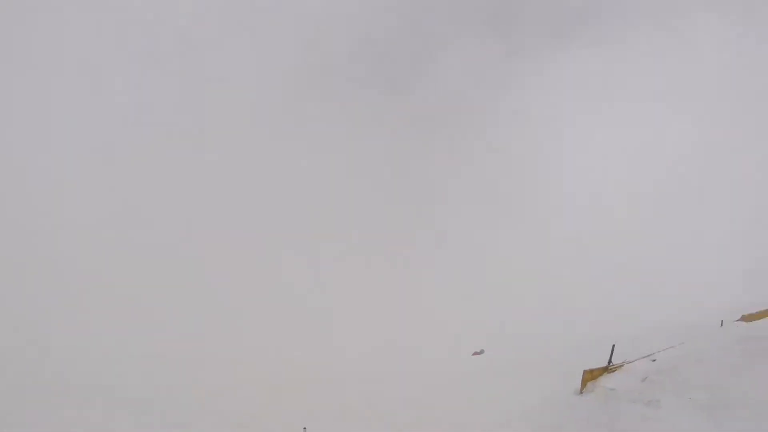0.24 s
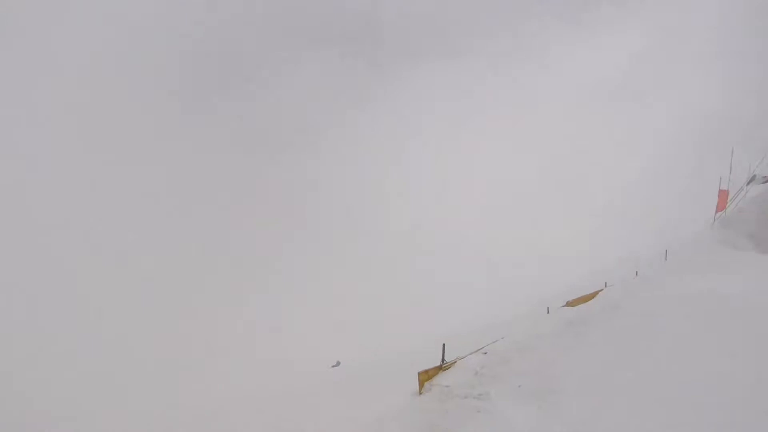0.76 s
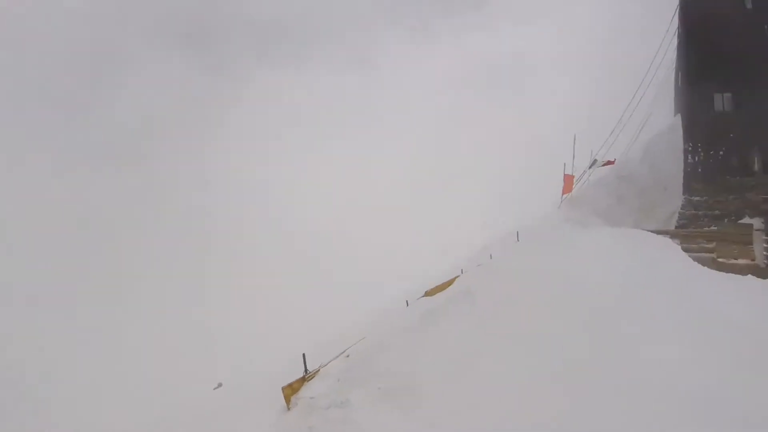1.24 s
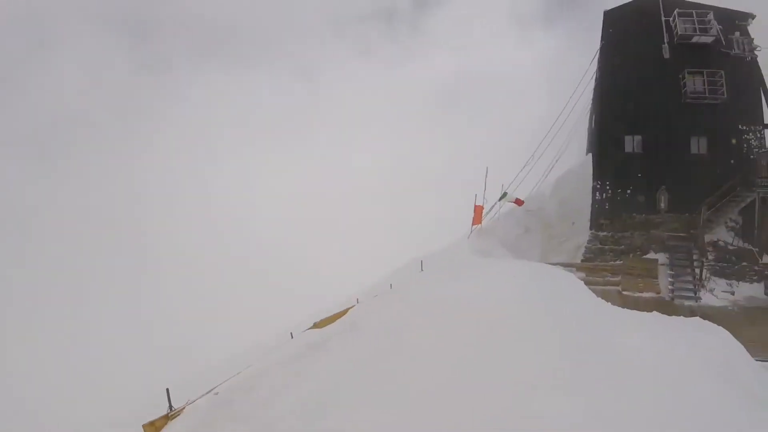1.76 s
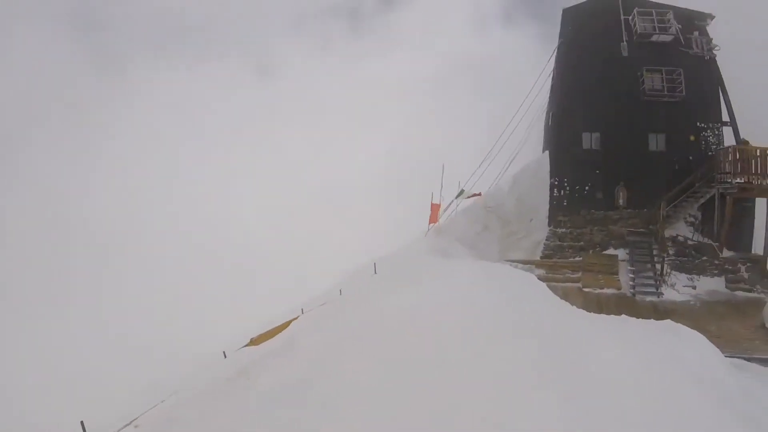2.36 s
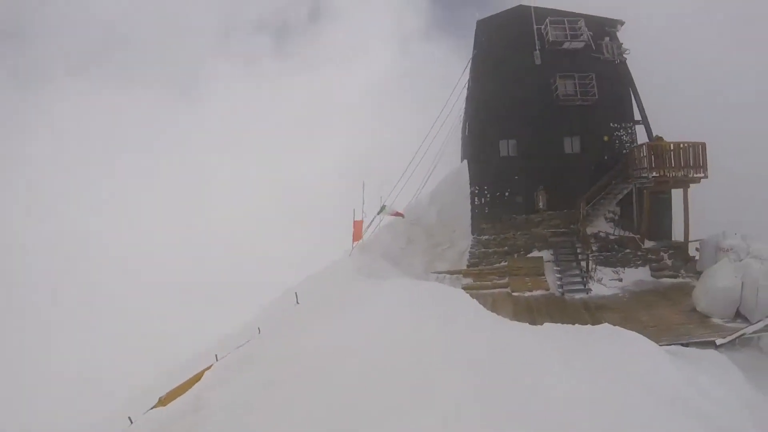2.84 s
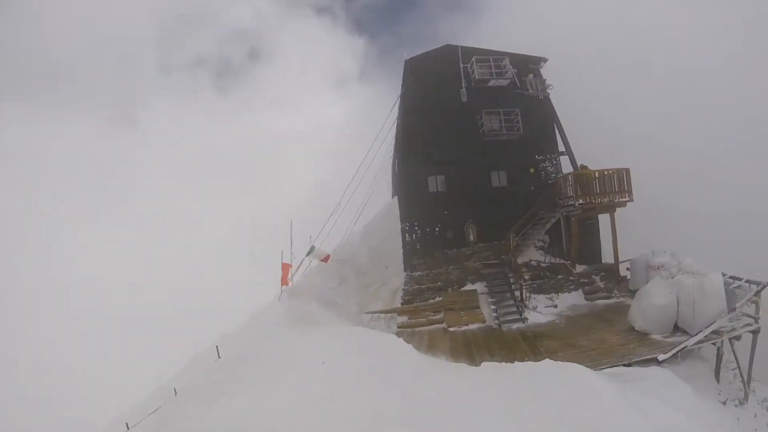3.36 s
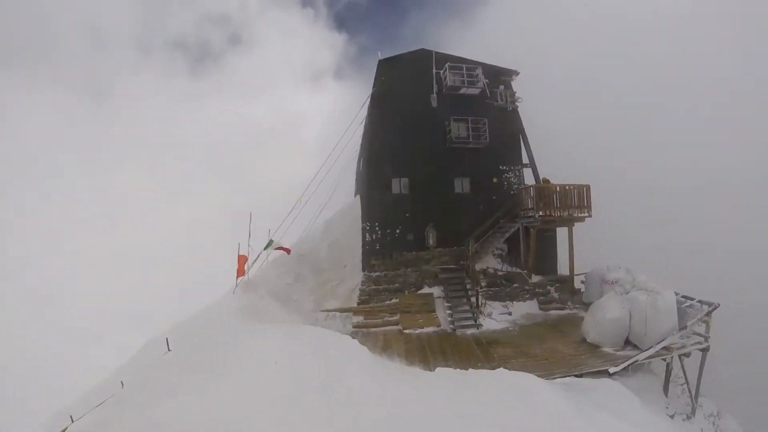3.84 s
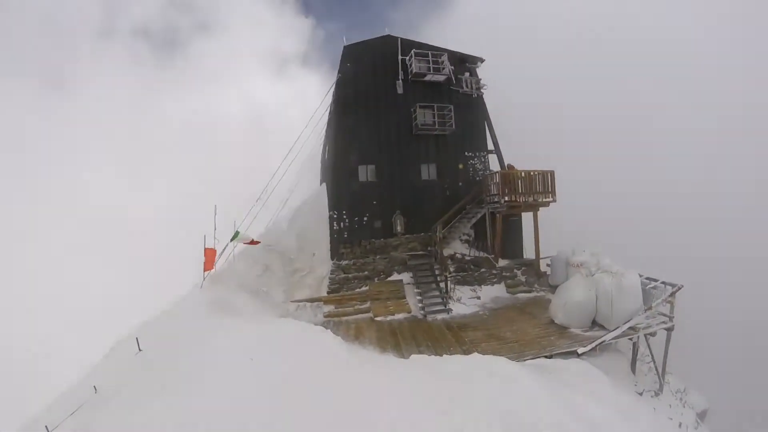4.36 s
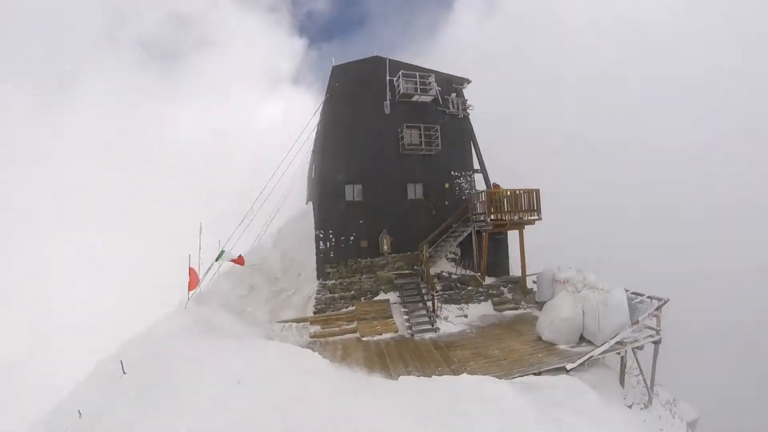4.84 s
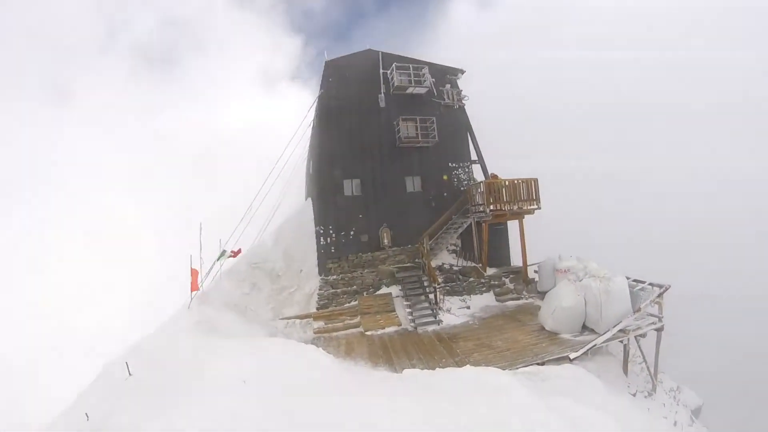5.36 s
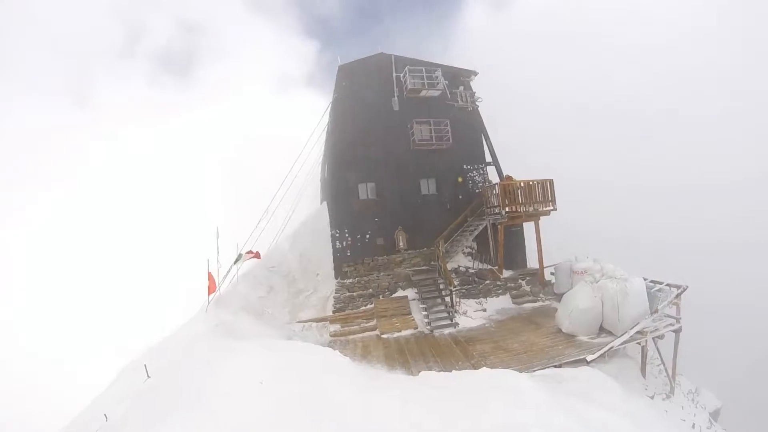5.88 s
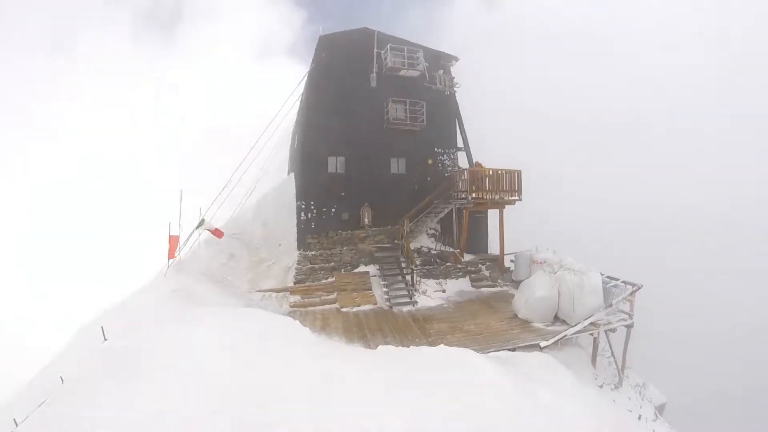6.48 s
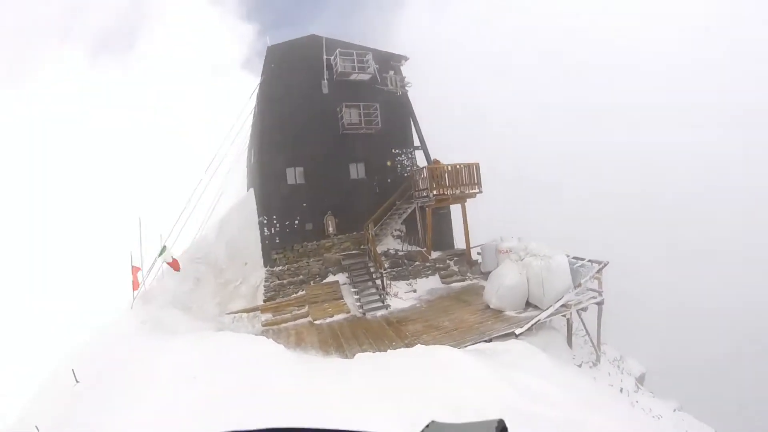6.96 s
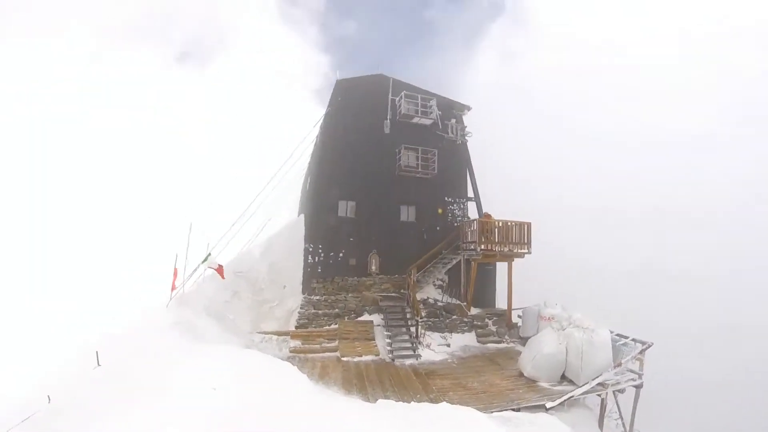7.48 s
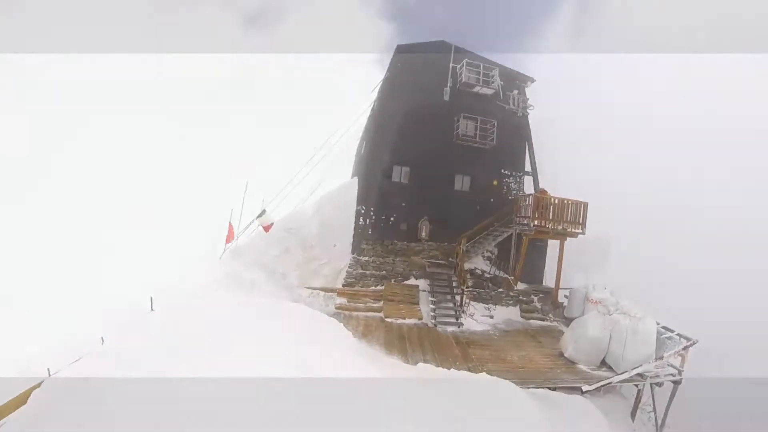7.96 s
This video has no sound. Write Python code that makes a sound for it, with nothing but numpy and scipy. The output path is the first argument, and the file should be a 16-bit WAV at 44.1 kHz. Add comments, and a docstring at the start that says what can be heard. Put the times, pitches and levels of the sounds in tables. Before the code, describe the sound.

Low windy rumble with ticking ice grains builds to a harsh hissing gust, then eases into ragged bumps, crackles and faint clicks.

```python
"""Ice grains tick over a low buffet; then strong wind on a snowy ridge swells across a small camera's
microphone port, with a churning roar and, at full gust, a tearing hiss. As it eases the flow breaks into eddies.
Wind is coloured noise under gust curves, eddies are noise bursts with a pressure push, grains are filtered clicks.
A small metal part tinkles as decaying modes, cloth rubs as patchy noise, farther wind whooshes softly
and the microphone hisses faintly."""
import sys
import numpy as np
from scipy import signal
from scipy.fft import rfft, irfft, next_fast_len
from scipy.io import wavfile
from scipy.ndimage import uniform_filter1d, map_coordinates

SR = 44100
rng = np.random.default_rng(int(sys.argv[2]) if len(sys.argv) > 2 else 0)


def waveform_to_disk(signal):
    """Save audio, clipped to [-1, 1], as 16-bit WAV at the path in sys.argv[1]."""
    frames = np.transpose(np.atleast_2d(signal))
    scaled = np.clip(frames, -1, 1) * 32767
    samples = np.round(scaled).astype(np.int16)
    wavfile.write(sys.argv[1], SR, samples)


N = 362325

# Noise colours are relative: noise() brings each one to rms 1.
# deep buffet: (frequency [Hz], level per Hz [dB])
BUFFET_COLOUR = [(12, -44.5), (22, 0.5), (45, -0.5), (70, 0.5), (130, -10), (260, -21.5), (600, -69.5)]
# roar at full gust: (frequency [Hz], level per Hz [dB])
FAST_ROAR_COLOUR = [(50, -16), (120, -3), (220, -0.5), (470, -5), (800, -16.5), (1300, -29), (3000, -48),
                    (8000, -90)]
# roar in slower flow: (frequency [Hz], level per Hz [dB])
SLOW_ROAR_COLOUR = [(50, -32), (120, -0.5), (220, -1.5), (470, -12.5), (800, -29), (1300, -50),
                    (3000, -56.5), (8000, -91.5)]
# tearing at full gust: (frequency [Hz], level per Hz [dB])
FAST_TEAR_COLOUR = [(500, 7), (1000, 2.5), (1600, 0), (2900, 0), (3600, -4.5), (4300, -12.5), (6000, -44.5)]
# tearing in slower flow, also the crackle of eddies: (frequency [Hz], level per Hz [dB])
CRACKLE_COLOUR = [(500, -11.5), (900, -1), (1500, -1.5), (2500, -11.5), (3800, -22), (6000, -38.5)]
# treble of the wind, the eddies and the farther hiss: (frequency [Hz], level per Hz [dB])
TREBLE_COLOUR = [(3000, -12), (4300, -5.5), (5100, 2), (6000, -5), (6600, -2.5), (8900, -17.5),
                 (10700, -33.5), (11400, -60.5), (14300, -85)]
# edge heard while the wind is rising: (frequency [Hz], level per Hz [dB])
EDGE_COLOUR = [(1500, -32), (2300, -5), (3000, 1), (3800, -4.5), (4600, -21.5)]
BRIGHT_DB, DULLER_DB = -9, -6.5  # treble re tearing, and its change once the flow is broken
EDGE_DB = -5  # re tearing
ROAR_CALMS = 0.22  # broken flow tears the roar less than the finer scales
GUST_LUMPS_DB, LUMPS_DB = 0.5, 1.1  # the flow arrives in lumps; extra lumpiness once broken
POINTED = 0.1  # how far buffet crests sharpen in broken flow


def wind():
    """Turbulence at the port: quick spurts drive the roar and finer scales, while the buffet heaves slowly."""
    buffet_db, roar_db, tear_db, ragged_db, broken, rising = controls()
    spurt = unit(0.58 * wobble(30) + wobble(90) + 1.13 * wobble(260))
    spurt = 1.9 * np.tanh((spurt + 0.63 * (spurt ** 2 - 1)) / 2.43)  # spurts peak, lulls are shallow

    def flow(share):
        """The spurts as a gain; share sets their depth."""
        return steady(amp(share * ragged_db * spurt), 0.18)

    sway_db = 0.29 * wobble(9)  # the flow also heaves a few times a second
    lumps_db = (GUST_LUMPS_DB + LUMPS_DB * broken) * wobble(22)

    heave = steady(noise(BUFFET_COLOUR), 0.081)
    crests = heave ** 2 - uniform_filter1d(heave ** 2, size=SR // 30)
    buffet_gain = amp(buffet_db + 0.6 * lumps_db + 0.14 * ragged_db * wobble(12) + 0.26 * sway_db)
    buffet = buffet_gain * unit(heave + POINTED * broken * crests)

    # faster flow sounds brighter
    roar_noise = blend((roar_db + 29.5) / 13, FAST_ROAR_COLOUR, SLOW_ROAR_COLOUR)
    roar_gain = amp(roar_db + 0.76 * lumps_db + 0.96 * sway_db)
    roar = roar_gain * flow(0.86 - ROAR_CALMS * broken) * roar_noise

    tear_noise = blend((tear_db + 62.0) / 18, FAST_TEAR_COLOUR, CRACKLE_COLOUR)
    tear = amp(tear_db + 0.52 * lumps_db + 0.86 * sway_db) * flow(0.92) * tear_noise

    treble_gain = amp(tear_db + 6.5 * sway_db + BRIGHT_DB + DULLER_DB * broken)
    treble = treble_gain * flow(0.8) * noise(TREBLE_COLOUR)

    edge_gain = amp(tear_db + 1.0 * sway_db + EDGE_DB) * rising * (1 - broken)
    edge = edge_gain * flow(1.0) * noise(EDGE_COLOUR)
    return buffet + roar + tear + treble + edge


# wind at the port, before the lulls:
# (time [s], deep buffet level [dB], roar level [dB], tearing level [dB])
GUST_LEVELS = [(0, -22.5, -30.5, -50), (.33, -22.5, -26.5, -55.5), (.6, -21, -21, -48),
               (.72, -24.5, -15, -45.5), (.86, -17, -17.5, -46.5), (1.0, -23, -18.5, -47),
               (1.2, -19, -21, -51), (1.42, -20.5, -17.5, -48), (1.56, -17, -15, -41.5),
               (1.7, -19.5, -20.5, -48.5), (1.95, -18.5, -16.5, -46), (2.08, -18.5, -17.5, -33),
               (2.3, -18, -19, -27.5), (2.46, -19, -20, -25.5), (2.58, -17, -19.5, -20),
               (2.72, -18.5, -21.5, -22.5), (2.92, -19.5, -15, -22), (3.2, -26.5, -17.5, -25.5),
               (3.55, -18, -14.5, -25), (3.9, -24, -17.5, -34), (4.15, -23.5, -25.5, -53),
               (4.45, -20, -26, -52), (4.64, -15.5, -19.5, -44), (4.73, -22, -19.5, -43.5),
               (4.8, -15, -23, -49), (5.2, -21, -26, -56.5), (5.635, -16, -23, -52),
               (5.685, -23, -20.5, -39), (5.74, -16, -25, -56), (6.4, -23, -27, -60), (7.0, -24, -31, -71),
               (7.4, -17, -23.5, -58), (7.55, -20, -25, -57), (7.8, -20.5, -29, -68),
               (7.93, -13.5, -26, -66), (8.22, -30.5, -27, -76)]
# the flow lets go for a moment; a positive change lifts that layer instead:
# (time [s], change of tearing [dB], change of roar [dB], half width [s])
FLOW_LULLS = [(0.204, 2, -8, 0.0072), (.31, 4.5, -2.5, 0.032), (1.499, -6, -6, 0.016),
              (1.605, -5.5, -4, 0.043), (2.01, -9, -3, 0.03), (2.172, -16, -2, 0.065),
              (2.365, -20, -1.5, 0.025), (2.448, -8, -2.5, 0.01), (2.506, -5, 4.5, 0.014),
              (3.032, -6.5, -0.5, 0.055), (3.662, -24, -10.5, 0.024), (3.718, -12, -5.5, 0.015),
              (3.744, -15, -1, 0.0074), (3.998, -3.5, -10, 0.0089), (4.331, -17, -15, 0.076),
              (4.538, -12, -14, 0.038), (4.768, -5, -5, .03), (5.25, -15, -0.5, 0.029),
              (5.541, -22, -14, 0.015), (6.75, 8, -0.5, 0.077), (7.07, 1, -6.5, 0.057),
              (7.694, -16, -12.5, 0.095), (8.021, -5, -4, 0.019)]
BUFFET_FOLLOWS = 0.57  # share of the roar's change
RISING_DB_PER_S = 10  # the edge is full at this rate of rise in the tearing
FRAYS_S, FRAYED_DB = 3.62, 1.5  # the gust frays before it settles
SETTLES_S, BROKEN_DB = 4.1, 3  # from here on the flow stays broken, and more ragged
# tearing at full gust; raggedness there; once broken, its growth per dB of tearing below full
FULL_DB, RAGGED_DB, RAGGED_GROWS = -25, 3, 0.093


def controls():
    """Levels of buffet, roar and tearing with the lulls cut in, and how ragged, broken and rising the flow is."""
    t = np.arange(N) / SR
    buffet_db, roar_db, tear_db = curves(GUST_LEVELS)
    rise_db_per_s = uniform_filter1d(np.gradient(tear_db) * SR, size=SR // 4)
    rising = np.clip(rise_db_per_s / RISING_DB_PER_S, 0, 1)
    broken = np.clip((t - SETTLES_S) / 0.11, 0, 1)
    below_full_db = np.maximum(FULL_DB - tear_db, 0)
    ragged_db = RAGGED_DB + RAGGED_GROWS * below_full_db * broken + BROKEN_DB * broken
    ragged_db = ragged_db + FRAYED_DB * (1 - broken) * (t > FRAYS_S)
    for s, tear_change_db, roar_change_db, width in FLOW_LULLS:
        near = slice(max(int((s - 2 * width) * SR), 0), int((s + 2 * width) * SR))
        dip = np.exp(-((t[near] - s) / width) ** 4)
        tear_db[near] += tear_change_db * dip
        roar_db[near] += roar_change_db * dip
        buffet_db[near] += BUFFET_FOLLOWS * roar_change_db * dip
    return buffet_db, roar_db, tear_db, ragged_db, broken, rising


# the strongest single eddies bursting at the port; levels drive the burst envelopes:
# (time [s], crackle level [dB], thump level [dB], treble level [dB])
STRONG_EDDIES = [(.6658, -32, -6, -32), (.938, -38, -2, -54), (1.3834, -34, -3, -47),
                 (1.706, -25, -3.5, -47), (1.898, -21, -12, -42), (2.0452, -10.5, -30, -17.5),
                 (2.125, -13, -17, -43.5), (2.295, -24, -24, -13), (2.422, -25, -4.5, -16),
                 (2.897, -10, 1, -14), (3.029, -8, -14, -44), (3.04, -10, -21, -26),
                 (3.252, -3, 3.5, -12.5), (3.325, -7, -2, -37), (3.6738, -31, -2, -38),
                 (3.691, -16, 0, -40), (3.704, -17, -8, -42), (3.727, -16, -13, -31),
                 (3.7615, -10, -5, -32), (3.796, -18, -14, -40), (3.8513, -14, -17, -26),
                 (3.917, -10, -17, -19.5), (3.974, -30, -11, -46), (4.0125, -21, -7.5, -33),
                 (4.042, -23, -25, -32), (4.0886, -21, -4, -33.5), (4.1174, -20, -5.5, -42),
                 (4.14, -22, -6.5, -38), (4.224, -29, -23, -56), (4.356, -51, -15, -71),
                 (4.4238, -18.5, -3, -36), (4.479, -24, -18, -48), (4.5154, -21.5, -6.5, -38),
                 (4.59, -25.5, -23, -40), (4.6084, -24, -3.5, -36), (4.6335, -28, -22, -37),
                 (4.66, -20, -27, -34), (4.7012, -21, -19, -29), (4.7216, -16, 1.5, -34),
                 (4.7895, -21, -6.5, -68), (4.82, -36, -11, -55), (4.833, -39, -19, -57),
                 (4.862, -34, -12, -47), (4.903, -28, -10, -45), (4.957, -31, -19, -53),
                 (4.972, -27, -16, -51), (4.996, -31, -14, -53), (5.012, -26, -5, -53),
                 (5.031, -35, -14, -55), (5.066, -36, -11, -54), (5.0997, -30, -7.5, -46),
                 (5.196, -31, -15, -54), (5.2807, -28, -10, -47), (5.307, -23, -12, -49),
                 (5.3174, -21.5, -10.5, -39), (5.334, -34, -18, -59), (5.3696, -25, -10, -42),
                 (5.427, -33, -6.5, -60), (5.455, -31, -11, -55), (5.4777, -13, 0, -35.5),
                 (5.5604, -25, -8, -52), (5.575, -23, -19, -50), (5.607, -25, -24, -45),
                 (5.627, -24, -24, -38), (5.6602, -21, -3.5, -36), (5.669, -19, -21, -38),
                 (5.683, -12.5, -1, -30.5), (5.695, -17.5, -28, -33), (5.7065, -22, -23, -42),
                 (5.8198, -20, -9.5, -34), (5.8453, -26, -9, -35), (5.9763, -26, -8.5, -68),
                 (6.025, -24, -35, -40.5), (6.1821, -26.5, -8, -51), (6.209, -31, -10, -44),
                 (6.277, -40, -15, -65), (6.325, -36, -1.5, -70), (6.387, -44, -19, -62),
                 (6.402, -33, -11.5, -54), (6.4515, -40, -14, -66), (6.6242, -33, -7.5, -61),
                 (6.651, -38, -13.5, -60), (6.7036, -42, -15, -57), (6.744, -40, -13, -57),
                 (6.8346, -31, -8, -48), (6.8446, -24, -6, -32), (6.891, -41, -12, -62),
                 (7.056, -44, -19, -65), (7.138, -49, -14, -66), (7.161, -38, -4, -58),
                 (7.1695, -28.5, -0.5, -40), (7.2644, -31, -6.5, -51), (7.3134, -20.5, -22, -52),
                 (7.4117, -27, -3.5, -56), (7.4505, -35, -15, -69), (7.5234, -19, -10.5, -49),
                 (7.749, -53, -13.5, -70), (7.8125, -34, -17.5, -59), (7.842, -45, -34, -63),
                 (7.888, -42, -13, -65), (7.9123, -33, -7, -54), (7.943, -33, -12, -58),
                 (8.058, -28, -10.5, -42), (8.071, -38, -14, -60), (8.101, -32, -34, -50),
                 (8.1177, -29, -8.5, -52), (8.1638, -33, -13, -59)]
# body of an eddy's thump: (frequency [Hz], level per Hz [dB])
THUMP_COLOUR = [(60, -23.5), (150, 2), (350, 6), (600, -1), (1000, -13), (1600, -28.5), (3000, -63)]
PUSH_DB, PUSH_S = -6.5, 0.0013  # an eddy's push re its thump; its half width


def eddies():
    """Each eddy is a short push and thump of pressure with a crackle and a spit of treble."""
    s, crackle_db, thump_db, treble_db = np.r_[STRONG_EDDIES, small_eddies(count=14)].T
    thump = bursts(s - .003, thump_db, rise=0.0064, t60=0.03) * steady(noise(THUMP_COLOUR), 0.0087)
    crackle = bursts(s - .001, crackle_db, rise=0.0018, t60=0.014) * steady(noise(CRACKLE_COLOUR), 0.0033)
    spit = bursts(s - .001, treble_db, rise=0.0013, t60=0.013) * steady(noise(TREBLE_COLOUR), 0.0038)
    return thump + pushes(s + .003, thump_db + PUSH_DB) + crackle + spit


# small eddies: crackle re tearing, random spread of it, thump re roar, treble re crackle
SMALL_OVER_DB, SMALL_SCATTER_DB, SMALL_THUMP_DB, SMALL_TREBLE_DB = -1, -1, -1.5, -26


def small_eddies(count):
    """Weak eddies at random moments once the flow has broken up."""
    _, roar_db, tear_db, *_ = controls()
    when, size = rng.random(count), rng.standard_normal(count)
    s = SETTLES_S + when * (N / SR - SETTLES_S - .01)
    k = (s * SR).astype(int)
    crackle_db = tear_db[k] + SMALL_OVER_DB + SMALL_SCATTER_DB * size
    thump_db = roar_db[k] + SMALL_THUMP_DB + SMALL_SCATTER_DB * size / 2
    return np.c_[s, crackle_db, thump_db, crackle_db + SMALL_TREBLE_DB]


def bursts(times, levels_db, rise, t60):
    """Envelopes that swell smoothly over the rise time and die away."""
    t = np.arange(SR // 5) / SR
    starts = np.bincount(np.round(times * SR).astype(int), amp(levels_db), N)[:N]
    envelope = amp(-60 * t / t60) * (1 - np.exp(-(t / rise) ** 2))
    return signal.fftconvolve(starts, envelope)[:N]


def pushes(times, levels_db):
    """One brief overpressure between two shallow troughs."""
    u = np.arange(-SR // 50, SR // 50 + 1) / SR / PUSH_S
    starts = np.bincount(np.round(times * SR).astype(int), amp(levels_db), N)[:N]
    return signal.fftconvolve(starts, (1 - u ** 2) * np.exp(-u ** 2 / 2), "same")


# ice grains hitting the housing: (time [s], peak level [dB])
ICE_TICKS = [(.038, -42), (0.182, -30.5), (0.3697, -17.5), (0.426, -35), (.452, -34), (.484, -30.5),
             (0.53, -29), (.567, -32), (.606, -35), (0.6903, -3), (1.924, -27), (1.944, -26), (1.975, -31),
             (2.03, -26), (3.499, -5.5), (4.241, -41), (4.434, -39), (4.53, -39), (6.847, -22.5),
             (7.281, -29)]
# colour of a strong grain: (frequency [Hz], level [dB])
HOUSING_COLOUR = [(500, -33.5), (1500, -5), (3000, 1.5), (4300, -1), (6500, 5.5), (9500, -8.5),
                  (11500, -43), (15000, -62)]
# colour of a light grain: (frequency [Hz], level [dB])
LIGHT_GRAIN_COLOUR = [(900, -39), (2000, -1), (3000, 1), (4000, -11), (5500, -9), (8000, -34)]
LIGHT_DB = -28.7  # grains below this peak are light


def ticks():
    """Each grain is one tap, coloured by the housing; light grains sound duller."""
    strong, light = np.zeros((2, N))
    for s, db in ICE_TICKS:
        blows = light if db < LIGHT_DB else strong
        blows[round(s * SR)] = amp(db)
    strong_taps = signal.fftconvolve(strong, tap(HOUSING_COLOUR))[:N]
    light_taps = signal.fftconvolve(light, tap(LIGHT_GRAIN_COLOUR))[:N]
    return strong_taps + light_taps


def tap(spectrum):
    """A minimum-phase click of peak 1: nothing sounds before the contact."""
    cepstrum = irfft(np.log(gain(spectrum, 1024)))
    cepstrum[1:512] *= 2  # fold the cepstrum onto positive times
    cepstrum[513:] = 0
    click = irfft(np.exp(rfft(cepstrum)))
    return click / np.abs(click).max()


# rings of the loose metal part: (time [s], level before a 6 dB trim [dB])
METAL_TINKLES = [(6.501, -39.5), (6.671, -33.5), (6.681, -42), (6.781, -40.5), (7.376, -42)]
# its modes: (frequency [Hz], mean level [dB], time to fall 60 dB [s])
METAL_MODES = [(2121, -13, .04), (2650, -6.5, 0.027), (3440, -9, 0.035), (4580, -10, 0.034),
               (5400, 3, 0.019), (6450, -7, 0.028), (6970, -6, 0.022)]
TINKLE_SCATTER_DB = 3  # spread of each mode's strength from ring to ring


def tinkles():
    """A small loose metal part rings briefly, its modes at new strengths each time and shaken by its rattle."""
    out, t = np.zeros(N + SR), np.arange(SR // 10) / SR
    for s, db in METAL_TINKLES:
        ring = np.zeros(len(t))
        for hz, level_db, t60 in METAL_MODES:
            phase_drift = np.cumsum(rng.normal(0, .07, len(t)))  # radians, a random step each sample
            mode_db = level_db + rng.normal(0, TINKLE_SCATTER_DB)
            ring += amp(mode_db - 60 * t / t60) * np.sin(2 * np.pi * hz * t + phase_drift)
        start = round(s * SR)
        out[start:start + len(t)] += amp(db - 6.0) * ring * (1 - np.exp(-t / 0.00034))
    return out[:N]


# strokes of the cloth: (time [s], level [dB], hold [s], brightest at [Hz])
CLOTH_RUBS = [(0.612, -47.5, 0.068, 5730), (0.713, -38, 0.048, 6570), (0.785, -44.5, 0.096, 5430),
              (6.59, -57, .012, 6700)]
# cloth noise: (frequency [Hz], level per Hz [dB])
CLOTH_COLOUR = [(1500, -49), (3200, -2), (4100, -5), (5450, 1), (6500, 3), (7400, -18), (9000, -42)]
RUB_ATTACK_S, RUB_RELEASE_S = 0.018, 0.025
RUB_PEAK_DB, RUB_WIDTH_HZ = 9.5, 350  # boost at each stroke's own pitch


def rustle():
    """Stiff cloth rubs near the camera: fluttering scrapes, each brightest at its own pitch."""
    out = np.zeros(N)
    for s, db, hold, hz in CLOTH_RUBS:
        corners = s + np.cumsum([0, RUB_ATTACK_S, hold, RUB_RELEASE_S])
        stroke, = curves(np.c_[corners, [0, 1, 1, 0]])
        f, _, z = signal.stft(noise(CLOTH_COLOUR), SR, nperseg=256)
        patches = uniform_filter1d(rng.standard_normal(z.shape), size=3, axis=0)  # over frequency
        patches = uniform_filter1d(patches, size=5, axis=1)  # over time
        peak_db = RUB_PEAK_DB * np.exp(-((f[:, None] - hz) / RUB_WIDTH_HZ) ** 2)
        scrape = signal.istft(z * amp(peak_db + 4.8 * unit(patches)), nperseg=256)[1][:N]
        out = out + amp(db) * stroke * unit(amp(1.2 * wobble(70)) * scrape)
    return out


# smooth wind past the camera, untouched by the lulls at the port:
# (time [s], whoosh level [dB], high hiss level [dB])
RUSH_LEVELS = [(0, -72, -65.5), (1.7, -58, -58.5), (2.0, -55, -46), (2.3, -45, -43.5), (2.6, -49, -39),
               (3.4, -46, -60), (3.7, -44, -70), (4.2, -74, -79), (6.95, -70, -74), (6.99, -53.5, -75),
               (7.12, -59, -74), (7.2, -70, -78), (8.22, -69, -75.5)]
# soft whoosh: (frequency [Hz], level per Hz [dB])
WHOOSH_COLOUR = [(500, -18.5), (800, 4), (1150, -1.5), (1500, -5.5), (1750, -24), (2500, -45)]


def rush():
    """Even, farther wind: a soft whoosh and a high hiss, each wavering slightly."""
    whoosh_db, high_db = curves(RUSH_LEVELS)
    whoosh = amp(whoosh_db + 1.6 * wobble(29)) * noise(WHOOSH_COLOUR)
    return whoosh + amp(high_db + 1.3 * wobble(39)) * noise(TREBLE_COLOUR)


def amp(db):
    """Decibels to linear gain."""
    return 10 ** (np.asarray(db) / 20)


def unit(x):
    """x scaled to rms 1."""
    return x / np.sqrt(np.mean(x ** 2) + 1e-20)


def curves(rows):
    """One value per sample for each column after the time."""
    s, *cols = np.transpose(rows)
    return [np.interp(np.arange(N) / SR, s, c) for c in cols]


def wobble(rate):
    """A smooth random curve, rate knots a second."""
    knots = rng.standard_normal(int(N * rate / SR) + 4)
    return map_coordinates(knots, [np.arange(N) * rate / SR])


def gain(spectrum, size):
    """Gain on an FFT grid from (frequency [Hz], level [dB]) points on a log axis."""
    f, db = np.transpose(spectrum)
    log_hz = np.log(np.fft.rfftfreq(size, 1 / SR) + 1)
    return amp(np.interp(log_hz, np.log(f), db, -120, -120))


def noise(spectrum):
    """Coloured noise of rms 1."""
    m = next_fast_len(N)
    return unit(irfft(rfft(rng.standard_normal(m)) * gain(spectrum, m), m)[:N])


def steady(x, seconds):
    """x with its power held at 1 over the given time."""
    return x / np.sqrt(np.abs(uniform_filter1d(x ** 2, size=int(seconds * SR))) + 1e-9)


def blend(share, fast, slow):
    """Noise whose colour moves between two spectra."""
    share = np.clip(uniform_filter1d(share, size=SR // 10), 0, 1)
    return np.sqrt(share) * noise(fast) + np.sqrt(1 - share) * noise(slow)


def scene():
    """Wind, eddies, grains, metal, cloth and farther wind in one channel."""
    return (wind() + eddies() + ticks() + tinkles() + rustle() + rush())[None]


# the microphone's faint hiss wavers slowly: (time [s], level [dB])
HISS_LEVELS = [(0, -59.5), (1.7, -60.5), (2, -62), (2.5, -59), (4.2, -71), (5.5, -71.5), (6.5, -64.5),
               (7.2, -63), (7.6, -67), (8.22, -65)]
# hiss, peaking at the port resonance: (frequency [Hz], level per Hz [dB])
HISS_COLOUR = [(600, -29), (2000, -12.5), (4700, -17.5), (5900, -21.5), (6500, 0), (7200, -11), (8800, -12),
               (11000, -23.5), (14300, -30), (15800, -41)]
TOP_HZ, ROLL_OFF_HZ = 15800, 11600  # nothing sounds above the first; all but the hiss rolls off at the second


def record(dry):
    """Peaks are rounded, the top rolls off, faint hiss is added and nothing sounds above TOP_HZ."""
    hiss_db, = curves(HISS_LEVELS)
    x = dry / (1 + np.abs(dry / .97) ** 4) ** (1 / 4)
    m = next_fast_len(N + SR // 2)
    hz = np.fft.rfftfreq(m, 1 / SR)
    x = irfft(rfft(x, m) / (1 + (hz / ROLL_OFF_HZ) ** 24), m)[..., :N]
    x = x + amp(hiss_db) * noise(HISS_COLOUR)
    from_ends = np.minimum(np.arange(N), np.arange(N)[::-1])
    x = x * np.clip(from_ends / (.004 * SR), 0, 1)  # soft start and end
    return irfft(rfft(x, m) * (hz < TOP_HZ), m)[..., :N]


dry = scene()
out = record(dry)
waveform_to_disk(out)
```